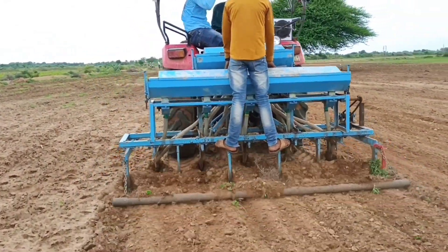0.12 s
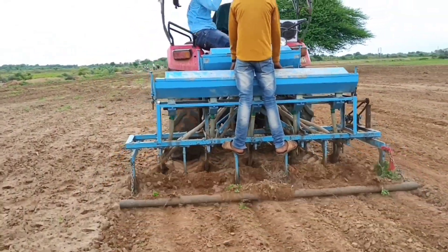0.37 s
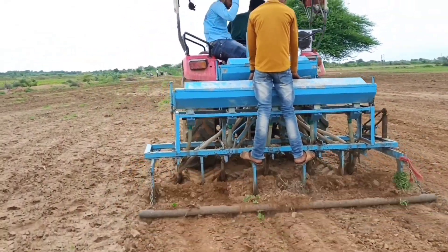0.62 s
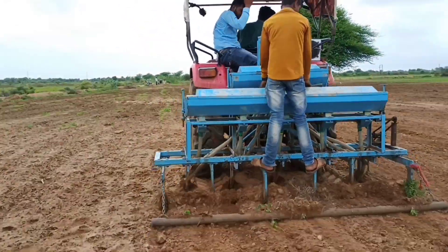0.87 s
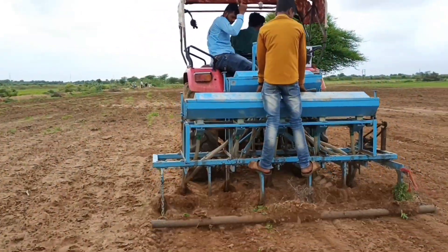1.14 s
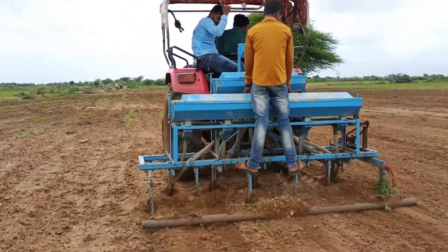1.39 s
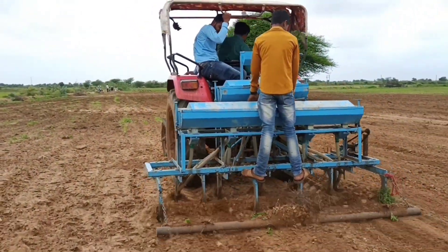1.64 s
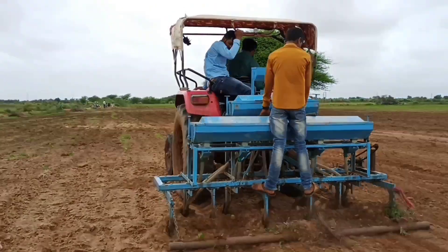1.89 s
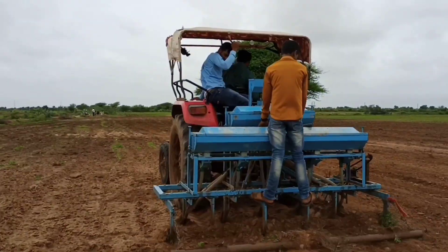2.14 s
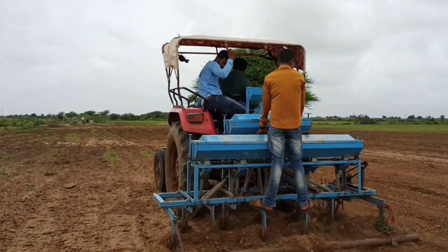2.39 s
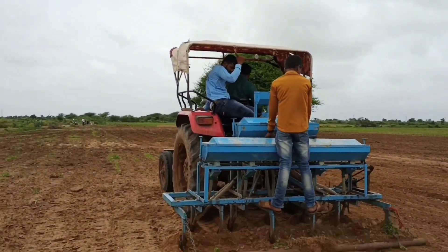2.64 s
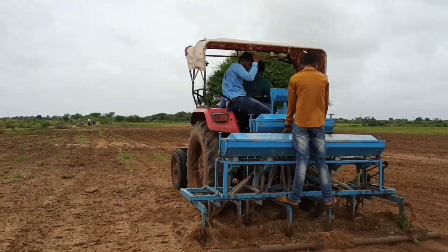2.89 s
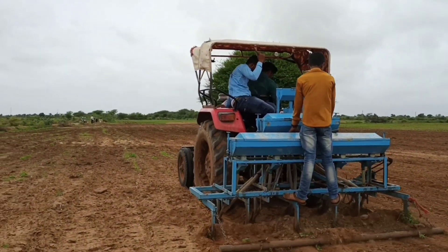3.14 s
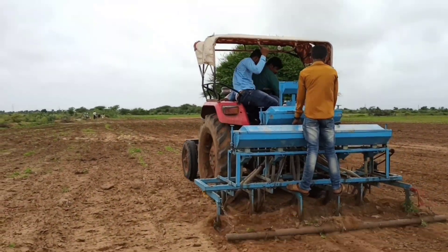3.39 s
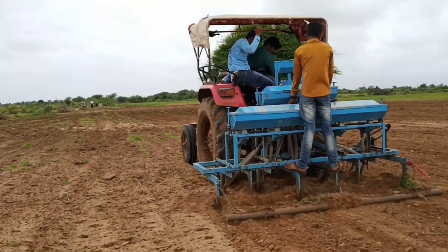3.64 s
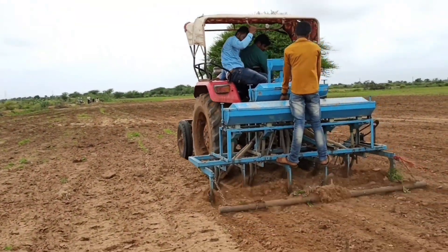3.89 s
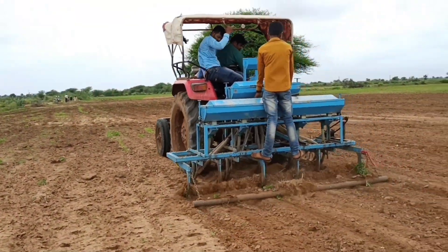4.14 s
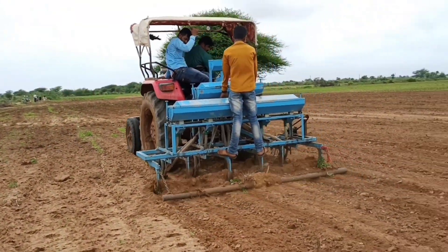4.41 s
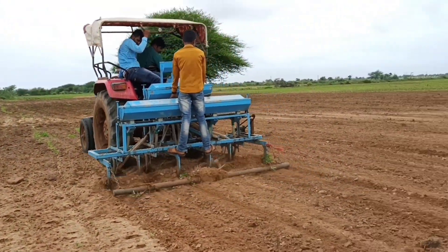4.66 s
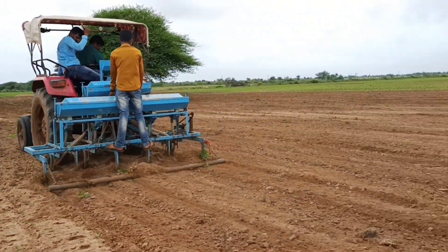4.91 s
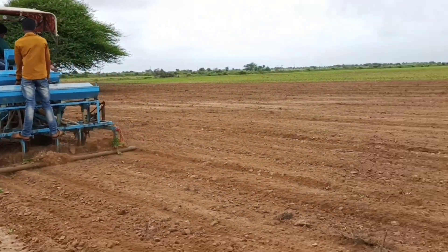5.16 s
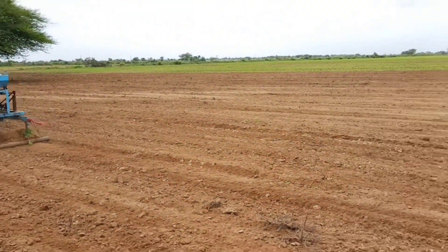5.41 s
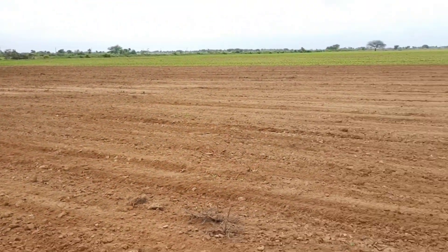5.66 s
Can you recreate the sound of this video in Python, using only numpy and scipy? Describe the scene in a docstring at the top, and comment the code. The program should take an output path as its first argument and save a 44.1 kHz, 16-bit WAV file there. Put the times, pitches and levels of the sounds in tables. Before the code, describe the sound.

Heavy low wind thumps and flutters dominate, with a faint fast diesel knocking, light metal clinking and a brief squeak behind.

```python
"""A field of dry, loose soil in a stiff wind: a diesel tractor draws a steel seed drill, followed on foot.
Wind buffets the bare microphone in shaped noise bands, short bursts and flutters; no exhaust note is heard.
Above it the engine knocks once per firing as noise pulses, loose steel clinks in decaying partials,
a bearing squeaks as a wavering tone, shoes scuff in swells of gritty noise and a few spikes click."""
import sys
import numpy as np
from scipy import signal
from scipy.fft import rfft, irfft, next_fast_len
from scipy.io import wavfile
from scipy.ndimage import uniform_filter1d, minimum_filter1d, map_coordinates

SR = 44100
rng = np.random.default_rng(int(sys.argv[2]) if len(sys.argv) > 2 else 0)


def file_out(sig):
    """Save sig as 16-bit WAV at sys.argv[1]."""
    # one column per channel
    cols = np.atleast_2d(sig).T
    # limit, then scale
    lim = np.clip(cols, -1, 1)
    pcm = np.round(lim * 32767).astype(np.int16)
    wavfile.write(sys.argv[1], SR, pcm)


def nominal_scale(level):
    """Amplitude ratio for a level in decibels (scalar or array-like)."""
    x = np.asarray(level, float) / 20
    return 10 ** x


N = 254894
TIME = np.arange(N) / SR  # s

# Wind at the microphone between gusts. Each row: time in seconds, relative strength in dB,
# eddy size as rumble over flapping in relative dB.
WIND = [(0.0, -22, 10), (0.19, -30.5, 9), (0.39, -24.5, 7.5), (0.56, -26, 9.5), (0.9, -22.5, 5),
        (1.56, -22.5, 6.5), (1.74, -23.5, 7), (2.3, -25.5, 7.5), (2.59, -22.5, 6), (2.77, -23.5, 9),
        (3.09, -28.5, 10.5), (3.41, -21, 4), (3.75, -28, 11.5), (3.93, -29, 8.5), (4.07, -27.5, 12.5),
        (4.54, -25.5, 4.5), (4.8, -25, 6.5), (4.92, -16.5, 3.5), (5.05, -21, 6), (5.78, -23, 12)]
# Gust fronts slapping the microphone port. Each row: start in seconds, relative level in dB, initial
# flutter pitch in Hz, rasp over flapping in relative dB, relative length in seconds.
GUSTS = [(0.019, -9.5, 513, -18, 0.016), (0.067, -12.5, 630, -22.5, 0.019), (0.119, -16, 494, -15, 0.021),
         (0.37, -17.5, 640, -13.5, 0.031), (0.481, -10.5, 436, -18, 0.018), (0.552, -9, 480, -22, 0.028),
         (0.61, -8.5, 470, -15, 0.034), (0.683, -9.5, 543, -26.5, 0.032), (0.797, -2.5, 496, -23.5, 0.012),
         (0.875, -20, 510, -15.5, 0.028), (0.909, -16.5, 439, -17.5, 0.025),
         (0.959, -12, 467, -19.5, 0.028), (1.043, -7, 482, -15.5, 0.048), (1.163, -9, 500, -15.5, 0.05),
         (1.289, -10.5, 430, -13.5, 0.028), (1.338, -13, 434, -15.5, 0.016), (1.372, -15.5, 431, -14, 0.02),
         (1.412, -4.5, 482, -24.5, 0.016), (1.524, -14, 505, -16, 0.028), (1.557, -10.5, 414, -16.5, 0.028),
         (1.599, -8, 453, -13, 0.042), (1.698, -12.5, 635, -25, 0.044), (1.851, -19.5, 620, -22, 0.028),
         (2.192, -10.5, 659, -17.5, 0.028), (2.372, -13.5, 460, -14, 0.048),
         (2.525, -16, 466, -11.5, 0.028), (2.647, -15, 536, -13.5, 0.028), (2.799, -6, 545, -25, 0.044),
         (2.887, -16.5, 500, -24.5, 0.028), (3.037, -6, 488, -16.5, 0.046), (3.076, -10, 493, -15.5, 0.011),
         (3.251, -9.5, 520, -16.5, 0.015), (3.323, -11, 464, -14, 0.03), (3.518, -19, 430, -16, 0.028),
         (3.703, -9.5, 576, -17, 0.019), (3.955, -7.5, 440, -22.5, 0.021), (4.032, -13, 479, -20.5, 0.025),
         (4.054, -12, 690, -16.5, 0.018), (4.083, -13.5, 696, -10.5, 0.028), (4.161, -11, 503, -12, 0.025),
         (4.209, -12.5, 540, -15.5, 0.039), (4.44, -13.5, 429, -22, 0.036),
         (4.724, -13.5, 545, -16.5, 0.028), (4.895, -8.5, 450, -22.5, 0.028),
         (4.931, -12, 426, -17.5, 0.035), (5.186, -13, 470, -18, 0.035), (5.297, -15, 495, -12.5, 0.028),
         (5.432, -10, 437, -18, 0.04), (5.586, -14, 444, -22.5, 0.028), (5.673, -12.5, 541, -26.5, 0.032)]


def unit(x):
    """Scales a signal to rms 1."""
    return x / np.sqrt(np.mean(x ** 2) + 1e-20)


def curves(rows):
    """Draws one value per sample for each column after the time."""
    s, *cols = np.transpose(rows)
    return [np.interp(TIME, s, c) for c in cols]


def wobble(rate):
    """Draws a smooth random curve with rate knots a second."""
    knots = rng.standard_normal(2000)
    return map_coordinates(knots, [np.arange(N) * rate / SR % 1990])


def coloured(x, spectrum):
    """Shapes x by (Hz, dB) points on a log frequency axis, to rms 1."""
    m = next_fast_len(N + 8192)
    f, db = np.transpose(spectrum)
    log_hz = np.log(np.fft.rfftfreq(m, 1 / SR) + 1)
    gain = nominal_scale(np.interp(log_hz, np.log(f), db, left=-120, right=-120))
    return unit(irfft(rfft(x, m) * gain, m)[:N])


def noise(spectrum):
    """Makes fresh coloured noise of rms 1."""
    return coloured(rng.standard_normal(N), spectrum)


def turned():
    """How far the microphone has turned into the wind, 0 to 1, over 0.3 s around 5.17 s."""
    return np.clip((TIME - 5.17) / .3 + .5, 0, 1)


def air():
    """Far field and microphone hiss: steady noise that thins as the tractor draws away."""
    # Each row: frequency in Hz, relative level in dB per Hz.
    air_spectrum = [(4500, -0.5), (6300, -4.5), (7500, -5), (9500, -1.5), (12500, -12), (15500, -13.5),
                    (15700, -26.5)]
    return nominal_scale(-64.5 - 0.9 * TIME) * noise(air_spectrum)


def walker():
    """Shoes scuff dry soil as swells of gritty hiss."""
    # Scuffs. Each row: peak time in seconds, level in dB, length in seconds.
    scuffs = [(1.387, -60, .03), (1.948, -64, 0.024), (2.43, -63, .04), (2.948, -60.5, 0.02),
              (3.574, -61.5, 0.042), (4.11, -68, 0.017), (4.147, -55.5, 0.069)]
    # Colour of the soil. Each row: frequency in Hz, relative level in dB per Hz.
    grit_spectrum = [(4500, -30), (6000, -10), (8000, -9), (10000, 0), (11800, -5), (13000, -18),
                     (15600, -24)]
    swell = sum(nominal_scale(db) * np.exp(-((TIME - s) / length) ** 2) for s, db, length in scuffs)
    return swell * unit(nominal_scale(3.4 * wobble(160)) * noise(grit_spectrum))


def clinks():
    """Loose steel striking the frame: each blow cracks as noise and rings partials at new strengths."""
    # Loud blows. Each row: start in seconds, relative level in dB.
    loud_blows = [(0.908, -33.5), (1.363, -34.5), (2.9458, -39), (3.0096, -32), (3.042, -31.5),
                  (3.0679, -39), (3.1266, -38), (3.152, -35), (3.188, -29), (3.593, -35), (3.6371, -34),
                  (3.699, -31.5), (4.1485, -28.5), (4.2857, -29.5), (4.4752, -24.5), (5.2048, -29.5),
                  (5.28, -28)]
    # Ringing modes of the steel. Each row: nominal pitch in Hz, relative level in dB, 60 dB decay in seconds.
    steel_modes = [(2200, 1.5, 0.037), (3380, 7.5, .07), (3830, 3.5, 0.031), (3670, -9.5, 0.046),
                   (4380, -13, .04), (5000, -24, .05), (6300, -35.5, .05)]
    # lesser blows are shaken loose around the loud ones
    chance = rng.standard_normal((2 * len(loud_blows), 2))
    lesser = [(abs(s + .07 * a), -42 + 2.5 * b) for (s, _), (a, b) in zip(2 * loud_blows, chance)]
    rings, cracks = np.zeros(N + SR), np.zeros(N + SR)
    t = np.arange(SR // 5) / SR
    for s, db in loud_blows + lesser:
        luck = rng.standard_normal((len(steel_modes), 2))
        luck *= [2.5, .006]  # scatter of strength in dB, and of pitch as a fraction
        ring = np.zeros(len(t))
        for (hz, level, t60), (a, b) in zip(steel_modes, luck):
            ring += nominal_scale(level + a - 60 * t / t60) * np.sin(2 * np.pi * hz * (1 + b) * t)
        i = round(s * SR)
        rings[i:][:len(t)] += nominal_scale(db - 8.0) * ring * (1 - np.exp(-t / 0.00042))
        cracks[i:][:len(t)] += nominal_scale(db - 5.0 - 60 * t / 0.053) * (1 - np.exp(-t / 0.0018))
    crack_spectrum = [(2200, -11.5), (3300, -1), (4300, -7), (4900, -18), (7500, -27), (10000, -34.5),
                      (13000, -55.5)]
    return rings[:N] + cracks[:N] * noise(crack_spectrum)


def bearing():
    """A dry bearing sings as one sine line, wavering in pitch and breathy in level."""
    # Each row: time in seconds, centre pitch in Hz, level in dB.
    squeak_line = [(3.8, 3705, -74), (3.83, 3750, -44), (3.9, 3550, -43), (3.97, 3690, -48),
                   (4.07, 3650, -43), (4.11, 3600, -70)]
    hz, db = curves(squeak_line)
    phase = 2 * np.pi * np.cumsum(hz + 70 * wobble(33)) / SR
    return nominal_scale(db) * unit(.6 + wobble(300)) * np.sin(phase)


def engine():
    """Every firing pulses three noise bands over a steady rattle; each pulse has its own size."""
    # Engine speed under changing load. Each row: time in seconds, firings a second.
    speed = [(0.0, 26.08), (0.6, 26.44), (1.2, 26.87), (1.8, 27.14), (2.7, 26.98), (3.1, 26.06),
             (3.5, 26.2), (3.9, 25.84), (4.6, 26.22), (5.2, 26.22), (5.78, 27.34)]
    # Rise and fall of the clatter, probably a microphone resonance excited by the wind.
    # Each row: time in seconds, relative level in dB.
    clatter_level = [(0.0, -47), (0.39, -41.5), (0.72, -50), (1.38, -48.5), (2.19, -52), (3.12, -48.5),
                     (3.7, -51.5), (4.02, -45), (4.49, -51.5), (5.78, -49)]
    # Colours of the low clatter, the middle ticks (about 5 to 7 kHz) and the high ticks.
    # Each row: frequency in Hz, relative level in dB per Hz.
    clatter_spectrum = [(900, -26), (1500, 7), (2000, 6.5), (2600, -13.5), (3200, -3.5), (3700, 4.5),
                        (4200, -6.5), (4800, -37), (5500, -46.5)]
    middle_spectrum = [(4300, -8), (4900, -1.5), (5500, -7), (6300, 0.5), (6900, -4), (7600, -18)]
    high_spectrum = [(7000, -16.5), (8000, -5.5), (9200, 4), (10500, -2), (11700, -5.5), (12800, -18.5),
                     (15400, -23), (15700, -24)]

    rate, = curves(speed)
    firings = np.cumsum(rate) / SR + .95  # starts late in a firing cycle
    since = firings % 1 / rate  # s since the last firing
    luck = rng.standard_normal((200, 3))[firings.astype(int)]

    def jolt(peak_s):
        """A pulse after each firing that peaks at 1, peak_s later."""
        return since / peak_s * np.exp(1 - since / peak_s)

    clatter = .45 + 1.3 * nominal_scale(2.5 * luck[:, 0]) * jolt(.0038)
    high = .42 + 1.2 * nominal_scale(.8 * luck[:, 0] + 2.4 * luck[:, 1]) * jolt(.003)
    middle = .45 + nominal_scale(.8 * luck[:, 0] + 3 * luck[:, 2]) * jolt(.003)

    clatter_db, = curves(clatter_level)
    high_db = clatter_db.mean() + .4 * (clatter_db - clatter_db.mean()) - 19.5
    high_db += 8 / (1 + TIME ** 4)  # the ticks start louder and drop around 1 s
    high_db += .5 * TIME  # then slowly come clear again
    high_db -= 3 * turned()  # and dull once the microphone has turned away
    middle_db = high_db - 6.0 + 3.0 * np.exp(-((TIME - .81) / .5) ** 2)  # a lift around 0.81 s

    clatter_noise = unit(clatter * nominal_scale(0.58 * wobble(60)) * noise(clatter_spectrum))
    high_noise = unit(high * nominal_scale(1.2 * wobble(90)) * noise(high_spectrum))
    middle_noise = unit(middle * nominal_scale(1.3 * wobble(100)) * noise(middle_spectrum))
    return nominal_scale(clatter_db + 4.5) * clatter_noise + nominal_scale(high_db) * high_noise + nominal_scale(middle_db) * middle_noise


def clicks():
    """Broadband clicks, the main two at the microphone's overloaded peaks: single negative spikes."""
    # Each row: time in seconds, level in dB before the dulling.
    snaps = [(1.0423, -18), (4.9394, -16.5), (5.1848, -30)]
    spikes = np.zeros(N)
    for s, db in snaps:
        spikes[round(s * SR)] = -nominal_scale(db)
    return signal.lfilter([.5], [1, -.5], spikes)  # slightly dulled


def flutters():
    """Each gust front sets the membrane fluttering: a sharp front, then a few dying cycles that slide in pitch."""
    out, t = np.zeros(N + SR), np.arange(2000) / SR
    luck = rng.uniform(-0.99, 1, (len(GUSTS), 2))
    for (s, db, hz, *_), (turn, slide) in zip(GUSTS, luck):
        cycles = hz * t * (1 + 12 * slide * t)
        phase = 2 * np.pi * cycles + turn + np.pi * (slide > 0)  # upward slides start inverted
        shape = (1 - np.exp(-(t / .0006) ** 2)) * np.exp(-t * hz / 2.74)
        out[round(s * SR):][:len(t)] += nominal_scale(db - 1.5) * shape * np.cos(phase)
    return out[:N]


def pops():
    """Each eddy bursting on the port is a push and pull of about one cycle and a half."""
    # Single eddies at set times, mostly strong. Each row: centre in seconds, relative level in dB, pitch in Hz.
    set_eddies = [(0.0457, -1.5, 125), (0.638, 8.5, 190), (0.7988, -7, 386), (0.815, -8, 172),
                  (0.9776, 0.5, 120), (1.042, 3, 195), (1.18, 5.5, 218), (1.2002, 7, 256),
                  (1.234, 2.5, 210), (1.2805, 10, 168), (1.3095, 5.5, 203), (1.3492, 8.5, 149),
                  (1.415, -5, 462), (1.635, 10, 244), (1.701, 10, 201), (2.8008, 4, 159),
                  (2.8227, 3.5, 244), (3.0977, 8, 176), (3.224, 6, 203), (3.2488, 2.5, 204),
                  (3.2699, 6, 224), (3.9562, 10, 184), (4.0589, 6, 183), (5.2776, -3, 163),
                  (5.3462, 8, 106), (5.4033, 8, 230), (5.4432, 4.5, 182)]
    strength_db = curves(WIND)[0]
    chance_eddies = []  # further ones come by chance
    for a, b, c in rng.uniform(0, 1, (30, 3)):
        db = strength_db[int(a * N)] + 18 + 8 * b  # follows the wind strength
        chance_eddies.append((a * N / SR, db, 167 * 2 ** (c - .5)))  # within an octave around 167 Hz
    out, t = np.zeros(N + SR), (np.arange(2000) - 1000) / SR
    for (s, db, hz), turn in zip(set_eddies + chance_eddies, rng.uniform(0, 2 * np.pi, 100)):
        burst = np.exp(-(t * hz / 0.58) ** 2) * np.cos(2 * np.pi * hz * t + turn)
        out[round(s * SR):][:len(t)] += nominal_scale(db - 8.0) * burst
    return out[1000:][:N]  # drops the lead-in, so that each burst is centred on its time


def swells():
    """Rumble amplitude of large slow eddies pressing on the port: smooth rise and fall."""
    # Each row: start in seconds, length in seconds, relative level in dB.
    large_eddies = [(0.022, 0.034, -9), (0.384, 0.069, -9.5), (0.52, 0.057, -11), (0.593, 0.072, -7.5),
                    (0.792, 0.053, -18), (0.874, 0.31, -12.5), (1.083, 0.19, -17), (1.255, 0.033, -13),
                    (1.328, 0.032, -18), (1.384, 0.047, -15), (1.554, 0.033, -24), (1.597, 0.039, -19),
                    (2.373, 0.049, -14), (2.629, 0.047, -20), (2.661, 0.045, -11), (2.789, 0.07, -18),
                    (3.092, 0.035, -10.5), (3.194, 0.024, -15), (3.242, 0.065, -13), (3.343, 0.098, -10.5),
                    (3.922, 0.051, -6), (4.036, 0.029, -11.5), (4.077, 0.067, -9), (4.37, 0.04, -19),
                    (4.844, 0.16, -14), (5.118, 0.059, -18), (5.189, 0.033, -14), (5.215, 0.11, -10),
                    (5.365, 0.095, -8.5), (5.458, 0.058, -14), (5.527, 0.11, -9.5)]
    out = np.zeros(N)
    for s, length, db in large_eddies:
        out += nominal_scale(db - 2) * np.exp(-((TIME - s - length / 2) / (0.39 * length)) ** 2)
    return out


def gusts():
    """Flapping and rasp amplitudes of the gust fronts: flapping jumps up, holds and drops, rasp builds behind."""
    out, t = np.zeros((2, N + SR)), np.arange(SR // 2) / SR
    for s, db, _, rasp_db, decay_s in GUSTS:
        build = .5 * decay_s  # time to the rasp's peak
        flap = (1 - np.exp(-t / .002)) * np.exp(-(t / (1.44 * decay_s)) ** 2)
        rasp = t / build * np.exp(1 - t / build)
        out[:, round(s * SR):][:, :len(t)] += nominal_scale([[db - 5], [db + rasp_db - 4.5]]) * [flap, rasp]
    return out[:, :N]


def wind():
    """Eddies of three sizes and a hiss follow one strength; lumps of pressure are partly shared between them."""
    # Colours from the largest eddies to the hiss, then the hiss with the port facing the wind.
    # Each row: frequency in Hz, relative level in dB per Hz.
    rumble_spectrum = [(13, -61), (22, -27), (38, -18.5), (75, -1), (97, 0), (173, -1), (278, -10.5),
                       (400, -20), (520, -31), (880, -120)]
    flap_spectrum = [(120, -5), (230, 0), (400, -3), (650, -8), (950, -18.5), (1500, -47.5)]
    rasp_spectrum = [(500, -4.5), (900, 1.5), (1400, -2.5), (2050, -10.5), (2400, -16), (4200, -21),
                     (5200, -55.5), (6500, -66.5)]
    hiss_spectrum = [(1500, -8.5), (2300, 1.5), (3000, 6), (4400, -4.5), (4750, -19.5), (5200, -40.5),
                     (6000, -52)]
    head_on_spectrum = [(1800, -11.5), (2500, 7), (4700, -8), (5200, -17.5), (6400, -26), (6800, -49.5)]

    strength_db, size_db = curves(WIND)
    mean_db = strength_db.mean()
    gust_flap, gust_rasp = gusts()
    lump, burst, lull = wobble(21.924), wobble(45), wobble(11)
    grain = 1.8 * burst + 1.6 * wobble(120)  # dB

    rumble = np.hypot(swells(), nominal_scale(strength_db + size_db - 2))
    rumble_swing = nominal_scale(0.85 * wobble(9) + 0.98 * lump + 0.9 * wobble(30))
    low = rumble * unit(rumble_swing * noise(rumble_spectrum))

    flap = np.hypot(gust_flap, nominal_scale(strength_db + 1.5 + 1.5 * lull))
    mid = flap * unit(nominal_scale(0.26 * lump + 2.4 * burst) * noise(flap_spectrum))

    steady_rasp_db = mean_db - 12 + .95 * (strength_db - mean_db) + 0.55 * lull + 1.4 * wobble(31)
    rasp = np.hypot(gust_rasp, nominal_scale(steady_rasp_db))
    top = rasp * unit(nominal_scale(0.2 * lump + grain) * noise(rasp_spectrum))

    slow = uniform_filter1d(rasp, size=3001)
    hiss_level = nominal_scale(-20.5) * slow * (slow / slow.mean()) ** 1.3  # swings wider than the smoothed rasp
    spit = nominal_scale(2.6 * wobble(110) + grain)
    hiss = hiss_level * unit(spit * noise(hiss_spectrum))
    hiss += nominal_scale(-45) * turned() * noise(head_on_spectrum)
    return low + mid + top + hiss * nominal_scale(wobble(45))


def scene():
    """All sources meet at one microphone."""
    tractor = engine() + clinks() + bearing()
    return (air() + walker() + tractor + clicks() + flutters() + pops() + wind())[None]


def low_pass(x):
    """Removes everything above the highest recorded frequency."""
    return signal.sosfilt(signal.butter(12, 15570, fs=SR, output="sos"), x)


def record(dry):
    """The port leaks away slow pressure, then a fast limiter turns down the strongest buffets."""
    port = signal.butter(4, 38, 'high', fs=SR, output='sos')
    dry = signal.sosfilt(port, dry)
    need = np.minimum(1, .87 / (np.abs(dry) + 1e-9))  # largest swing let through: 0.87
    gain = uniform_filter1d(minimum_filter1d(need, size=257), size=129)
    gain = uniform_filter1d(gain, size=129)
    return low_pass(dry * gain)


dry = scene()
out = record(dry)
file_out(out)
```